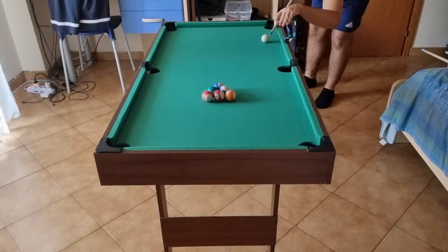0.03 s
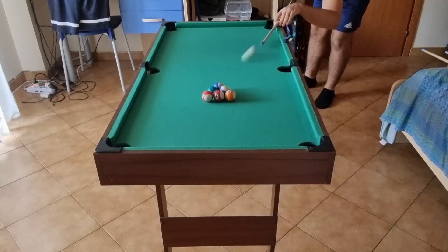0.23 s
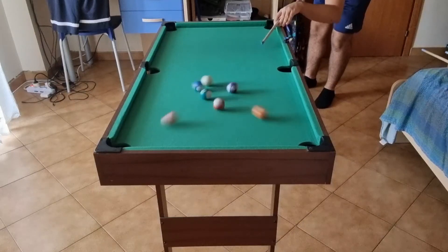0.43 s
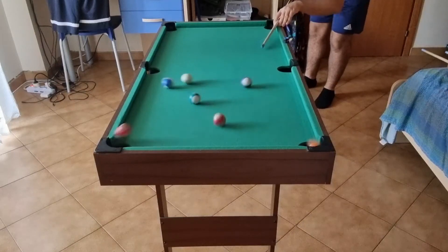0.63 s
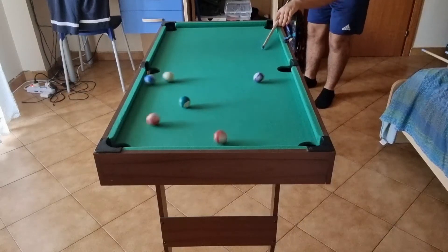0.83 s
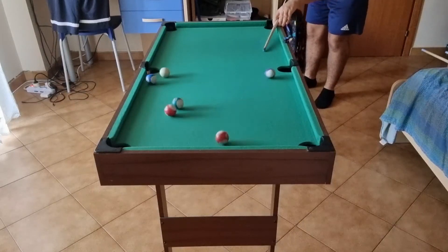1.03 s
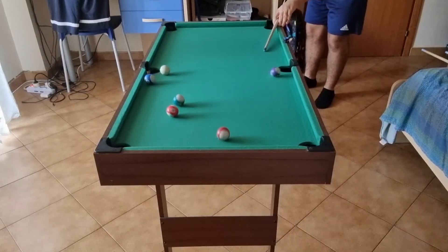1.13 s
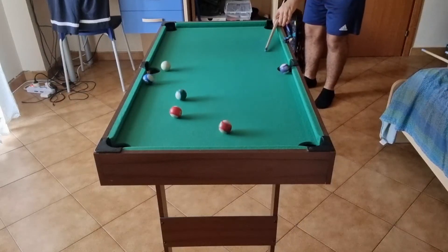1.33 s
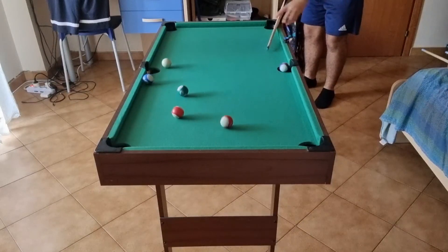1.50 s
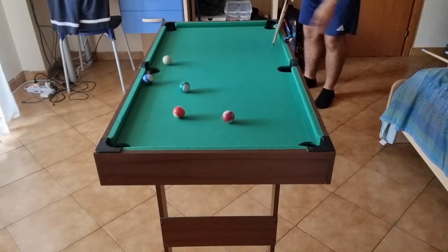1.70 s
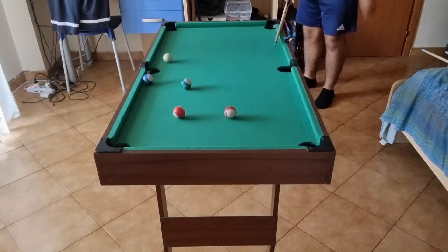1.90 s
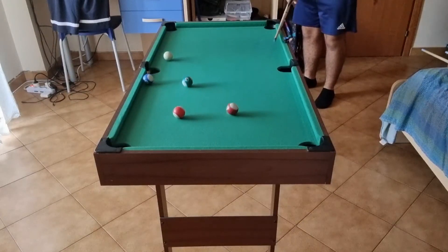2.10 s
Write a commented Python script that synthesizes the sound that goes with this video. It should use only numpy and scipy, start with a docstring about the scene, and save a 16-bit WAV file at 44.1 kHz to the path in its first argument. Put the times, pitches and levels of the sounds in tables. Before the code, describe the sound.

Pool balls crack apart in a break shot, then knock against the rails and roll.

```python
"""A break shot on a small wooden pool table in a tiled room.
Over quiet air and a low boom the cue slides over the hand, then knocks the white ball at 0.2 s.
At 0.35 s the ball cracks into the rack, leaving a glassy ring. Amid faint rustles, balls rumble over
the bed, thud on the cushions, knock on the rails and clack together; at 1.6 s one sinks into a pocket
with a hollow boom. Every blow shakes the table, and the hard room rings after it."""
import sys
import numpy as np
from scipy import signal
from scipy.fft import rfft, irfft
from scipy.io import wavfile
from scipy.ndimage import uniform_filter1d, minimum_filter1d

SR = 44100
rng = np.random.default_rng(int(sys.argv[2]) if len(sys.argv) > 2 else 0)


def digitize_waveform(pressure):
    """Quantize a signal to 16-bit integers and store it at the path in sys.argv[1].

    Rows of a 2-D input are taken as channels; values are limited to [-1, 1].
    """
    field = np.atleast_2d(pressure).T
    bounded = np.clip(field, -1, 1)
    quanta = np.round(bounded * 32767).astype(np.int16)
    wavfile.write(sys.argv[1], SR, quanta)


N = 94815
FFT_SIZE, BLOW_SAMPLES = 32768, 28672
HZ = np.fft.rfftfreq(FFT_SIZE, 1 / SR)


def amp(db):
    """Decibels to gain."""
    return 10 ** (np.asarray(db) / 20)


def at_hz(points, hz):
    """Interpolates a table on a log-frequency axis."""
    f, value = np.transpose(points)
    return np.interp(np.log(hz + 1), np.log(f + 1), value)


def unit_energy(x):
    """Scales to a mean energy of 1 per channel."""
    return x / np.sqrt(np.mean(np.sum(x ** 2, -1)) + 1e-20)


def unit_rms(spectrum):
    """Scales to RMS 1."""
    return spectrum / np.sqrt(np.mean(abs(spectrum) ** 2))


def add(mix, start_s, sound):
    """Mixes a stereo sound in at start_s."""
    part = mix[:, max(round(start_s * SR), 0):][:, :sound.shape[1]]
    part += sound[:, :part.shape[1]]


def delay(seconds):
    """Spectrum of a pure delay."""
    return np.exp(-2j * np.pi * HZ * seconds)


def click(gain):
    """Minimum-phase spectrum: the sharpest click of this colour, RMS 1."""
    log_gain = np.log(np.maximum(gain / gain.max(), 1e-6))
    cepstrum = irfft(log_gain)
    cepstrum[1:len(HZ) - 1] *= 2
    cepstrum[len(HZ):] = 0
    return unit_rms(np.exp(rfft(cepstrum)))


def body(colour, modes):
    """Gain of a struck body: broad colour times resonant peaks."""
    lift = sum((amp(db) ** 2 - 1) / (1 + (2 * (HZ - hz) / width_hz) ** 2) for hz, width_hz, db in modes)
    return amp(at_hz(colour, HZ)) * np.sqrt(np.maximum(1 + lift, .1))


def stereo(signals, coherence):
    """Two independent signals to left and right of a given coherence."""
    coherence = np.clip(coherence, -1, 1)
    mid = signals[0] * np.sqrt((1 + coherence) / 2)
    side = signals[1] * np.sqrt((1 - coherence) / 2)
    return np.array([mid + side, mid - side])


def scatter(size, step=8):
    """Two trains of random-sign taps, one tap per step samples."""
    taps = np.zeros((2, size))
    slots = np.arange(0, size - step, step)
    positions = slots + rng.integers(0, step, (2, len(slots)))
    np.put_along_axis(taps, positions, rng.choice([-1., 1.], positions.shape), 1)
    return taps


# room decay: f/Hz, T60/s
ROOM_DECAY = [(60, .9), (150, .85), (400, 0.41), (1000, 0.32), (2000, 0.38), (4000, 0.3), (7000, 0.33),
              (14000, .3)]
# room left-right likeness: f/Hz, coherence/0-1
ROOM_COHERENCE = [(60, 0.93), (200, 0.98), (450, 0.67), (900, .25), (2000, 0.08), (4000, 0.067),
                  (12000, .05)]
def room_tail(build_s):
    """Diffuse sound builds up, then dies at its own rate in each band."""
    hz, t, bands = signal.stft(scatter(BLOW_SAMPLES), SR, nperseg=512)
    bands = stereo(bands, at_hz(ROOM_COHERENCE, hz)[:, None])
    decay = amp(-60 * t / at_hz(ROOM_DECAY, hz)[:, None])
    tail = signal.istft(bands * decay, SR)[1][:, :BLOW_SAMPLES]
    swell = 1 - np.exp(-np.arange(BLOW_SAMPLES) / SR / build_s)
    return unit_energy(tail * swell)


# early reflections: nominal delay/s, level re direct/dB
REFLECTIONS = [(.0042, -15.5), (.0078, -12.5)]
# left-right likeness of the table's shaking: f/Hz, coherence/0-1
SHAKE_COHERENCE = [(100, 0.96), (350, 0.7), (800, 0.7), (3000, 0), (10000, 0)]
# colour of the tiled room: f/Hz, level/dB
TILE_SPECTRUM = [(100, 1), (400, 1), (1500, -2), (2400, 3), (3300, 2), (4100, 2.5), (5200, 4), (8000, -0.5)]
def blow(gain, direct_db, pan_db, build_s, shake_db, shake_s):
    """One impact: direct click and reflections, then the table shakes and the room rings."""
    cloth_echo = amp(-6) * delay(.00076)
    direct = unit_rms(click(gain) * (1 + cloth_echo)) * np.array([delay(0), delay(.00002)])
    direct *= 1 + sum(amp(db) * delay(lag_s * rng.uniform(.9, 1.1)) for lag_s, db in REFLECTIONS)
    t = np.arange(4096) / SR
    shake = unit_energy(scatter(len(t)) * np.exp(-t / shake_s))
    shake = stereo(rfft(shake, FFT_SIZE), at_hz(SHAKE_COHERENCE, HZ))
    diffuse = rfft(room_tail(build_s), FFT_SIZE) + amp(shake_db) * shake
    # flatten over 142.3 Hz bands, then colour
    band_power = uniform_filter1d((abs(diffuse) ** 2).mean(0), round(142.3 / HZ[1]))
    colour = gain * amp(at_hz(TILE_SPECTRUM, HZ)) / np.sqrt(band_power)
    diffuse = unit_rms(diffuse * click(colour))
    sound = irfft(amp(direct_db) * direct + diffuse)[:, :BLOW_SAMPLES]
    return sound * np.sqrt(.01 * SR) * amp([[pan_db / 2], [-pan_db / 2]])


def strikes(rows, gain, build_s, shake_db, shake_s, bass_hz=260, treble_hz=2400):
    """Blows on one body, each with its own weight (bass shelf) and hardness (treble shelf)."""
    out = np.zeros((2, N))
    bass = 1 / (1 + (HZ / bass_hz) ** 3)
    treble = 1 - 1 / (1 + (HZ / treble_hz) ** 2)
    for start_s, db, bass_db, treble_db, direct_db, pan_db in rows:
        colour = gain * amp(bass_db * bass + treble_db * treble)
        add(out, start_s, amp(db) * blow(colour, direct_db, pan_db, build_s, shake_db, shake_s))
    return out


def wash(colour, levels):
    """Coloured room noise along a level curve."""
    hz = np.fft.rfftfreq(N, 1 / SR)
    white = stereo(rfft(rng.standard_normal((2, N))), at_hz(ROOM_COHERENCE, hz))
    noise = irfft(white * amp(at_hz(colour, hz)), N)
    envelope = amp(np.interp(np.arange(N) / SR, *np.transpose(levels)))
    return unit_energy(noise) * np.sqrt(N) * envelope


# room air: f/Hz, level/dB
AIR_SPECTRUM = [(20, -8.5), (100, -6), (200, -7.5), (450, -10.5), (1000, -17.5), (2000, -28), (5000, -39),
                (9000, -49), (15000, -47.5)]
def room_air():
    """Steady noise of the quiet room."""
    return wash(AIR_SPECTRUM, [(0, -68)])


# boom envelope: t/s, level/dB
BOOM_LEVELS = [(0, -69), (.1, -58.5), (0.251, -55.5), (.38, -58.5), (.6, -66.5), (.88, -56.5), (1.05, -65),
               (1.4, -76), (1.581, -72.5), (1.66, -49.5), (1.77, -50), (1.9, -68.5), (2.022, -48.5),
               (2.15, -69)]
# boom colour: f/Hz, level/dB
BOOM_SPECTRUM = [(15, -16.5), (36, -13), (50, 1.5), (62, 0.5), (85, -29.5), (200, -42), (1000, -71.5),
                 (16000, -100)]
def room_boom():
    """The room's low boom swells and fades."""
    return wash(BOOM_SPECTRUM, BOOM_LEVELS)


# rumble envelope: t/s, level/dB
ROLL_LEVELS = [(0, -58.5), (.19, -70), (0.251, -83), (0.401, -69), (.6, -57.5), (0.902, -48), (1.1, -65),
               (1.249, -81), (1.549, -79), (1.7, -50.5), (1.9, -55.5), (2.03, -57), (2.15, -62.5)]
# rumble colour: f/Hz, level/dB
ROLL_SPECTRUM = [(30, -27), (80, -13), (112, 12), (200, -10), (500, -6), (900, -15.5), (1600, -23.5),
                 (4000, -49), (16000, -69.5)]
def rolling():
    """Balls rumble over the bed."""
    return wash(ROLL_SPECTRUM, ROLL_LEVELS)


# cue over hand, then rustles: peak t/s, level/dB, rise/s, decay/s
RUSTLE_EVENTS = [(.01, -70.5, 0.029, .04), (.11, -75, 0.045, 0.12), (.583, -66, .006, 0.021),
                 (0.655, -49, 0.0025, .025), (1.644, -59.5, 0.0077, 0.028), (1.752, -71, .008, .03),
                 (1.874, -62.5, 0.0069, 0.041)]
# rustle colour: f/Hz, level/dB
RUSTLE_SPECTRUM = [(200, -13), (1500, -0.5), (3000, -1), (5500, -1.5), (7500, -5), (10000, -12),
                   (15000, -14)]
def rustles():
    """The cue slides over the hand, then short, faint rustles sound close by."""
    out, t = np.zeros((2, N)), np.arange(N) / SR
    hiss = wash(RUSTLE_SPECTRUM, [(0, 0.00059)])
    for peak_s, db, rise_s, decay_s in RUSTLE_EVENTS:
        envelope = np.exp(-np.maximum((peak_s - t) / rise_s, (t - peak_s) / decay_s))
        out += hiss * amp(db) * envelope
    return out


# cue shot, two knocks: t/s, level/dB, bass/dB, treble/dB, direct/dB, left-right/dB
CUE_BLOWS = [(.2005, -22, -4, -15.5, -6, -0.5), (.2085, -21.5, 2.5, 9, -10.5, 1)]
# cue colour: f/Hz, level/dB
CUE_SPECTRUM = [(40, -34), (150, -3), (500, -1), (1400, 2.5), (2500, -4), (4000, -12), (6000, -15.5),
                (8000, -22), (9500, -27), (13000, -34.5), (16000, -42.5)]
# shaft resonances: f/Hz, width/Hz, lift/dB
SHAFT_MODES = [(458, 50, 6), (1040, 60, 5), (1200, 60, 4), (1423, 30, 11), (1495, 45, 7), (1980, 28, 12),
               (2350, 50, 5), (2885, 40, 9), (3280, 45, 4), (4230, 70, 4), (5350, 55, 8), (5850, 90, 6),
               (8050, 90, 6)]
def cue():
    """Tip on ball, then a second knock as the ball lands or the shaft rattles."""
    return strikes(CUE_BLOWS, body(CUE_SPECTRUM, SHAFT_MODES), build_s=.003, shake_db=-1.5, shake_s=.045)


# ball on cushion or pocket liner: t/s, level/dB, bass/dB, treble/dB, direct/dB, left-right/dB
CUSHION_BLOWS = [(.204, -31, -3, -18, -23, 2.5), (.349, -34, 7, 27.5, -7, -1),
                 (.592, -46.5, 29.5, 14, -1.5, 0), (.659, -43, 3, -3, -8.5, 0),
                 (.7155, -46.5, -7.5, -19, 2, -3), (.7215, -29.5, -7, -17, -6.5, 2),
                 (.9755, -30.5, -13.5, -19, -13, 0.5), (1.405, -49, -4, -8, -11, 0.5),
                 (1.742, -54, 20, -5, -8, -1.5), (1.860, -39.5, -6.5, -13.5, -7, 1),
                 (1.945, -48.5, -22, -12, -12.5, -6)]
# rubber colour: f/Hz, level/dB
RUBBER_SPECTRUM = [(30, -34), (100, 1), (300, 3.5), (480, 6.5), (800, -6), (1200, -19), (2000, -30.5),
                   (3800, -39), (6000, -44.5), (10000, -58.5), (15000, -51)]
# table resonances, shared with rail_knocks: f/Hz, width/Hz, lift/dB
WOOD_MODES = [(101, 10, 9), (130, 16, 4), (195, 20, 5), (293, 20, 5), (335, 25, 3), (470, 25, 2),
              (558, 22, 5), (705, 25, 4), (743, 22, 6), (792, 22, 9), (897, 20, 5), (936, 20, 5),
              (1020, 30, 3), (1102, 25, 4), (1180, 40, 3), (1580, 70, 3), (3150, 200, 4)]
def cushion_thuds():
    """Soft, heavy contacts drive the table at low frequencies."""
    gain = body(RUBBER_SPECTRUM, WOOD_MODES)
    return strikes(CUSHION_BLOWS, gain, build_s=.0098, shake_db=-.5, shake_s=.012)


# ball on ball, break first: t/s, level/dB, contact cut-off/Hz, direct/dB, left-right/dB
BALL_BLOWS = [(0.3454, -13, 7220, -3, 0), (0.3674, -28, 7010, 1.5, 0.5), (0.9129, -35, 6000, -7.5, 0.5),
              (0.918, -44.5, 5970, -9, 1), (0.9335, -45.5, 5600, -7, 0.5), (1.0284, -32.5, 5500, 4, 0)]
# ball colour: f/Hz, level/dB
BALL_SPECTRUM = [(40, -32.5), (300, -22.5), (800, -25), (1400, -13.5), (2100, -11.5), (2700, -3.5),
                 (3600, 0.5), (5000, -6), (6200, -18.5), (8000, -18), (16000, -32.5)]
def ball_clacks():
    """Hard balls touch for a fraction of a millisecond; slower ones touch longer and sound duller."""
    out, ball = np.zeros((2, N)), amp(at_hz(BALL_SPECTRUM, HZ))
    break_cutoff_hz = BALL_BLOWS[0][2]
    for start_s, db, cutoff_hz, direct_db, pan_db in BALL_BLOWS:
        hardness = cutoff_hz / break_cutoff_hz
        floor = amp(-32.5) * hardness ** 2
        contact = 1 / np.sqrt(1 + (HZ / cutoff_hz) ** 18) + floor
        build_s = .027 * hardness ** 3  # the room swells sooner after softer clacks
        clack = blow(ball * contact, direct_db, pan_db, build_s, shake_db=-14.5, shake_s=.015)
        add(out, start_s, amp(db) * clack)
    return out


# glassy ring: f/Hz, level/dB, T60/s
RING_MODES = [(2673, -27, .35), (2763, -29, .42), (2843, -30, .4), (3463, -30, .35), (3602, -29, .38),
              (3874, -26, .36), (3959, -19.5, .38), (4056, -21.5, .38), (4088, -26, .35), (4419, -26, .38),
              (4716, -29, .38)]
def break_ring(build_s=.045, spread_rad=.5):
    """High resonances swell after the crack and die with the room."""
    t = np.maximum(np.arange(N) / SR - BALL_BLOWS[0][0], 0)
    phases = rng.uniform(0, 2 * np.pi, (len(RING_MODES), 1, 1))
    phases = phases + spread_rad * rng.standard_normal((len(RING_MODES), 2, 1))  # per channel
    ring = sum(amp(db - 60 * t / t60_s) * np.sin(2 * np.pi * hz * t + phase)
               for (hz, db, t60_s), phase in zip(RING_MODES, phases))
    return ring * (1 - np.exp(-t / build_s))


# ball on rail or pocket wall: t/s, level/dB, bass/dB, treble/dB, direct/dB, left-right/dB
RAIL_BLOWS = [(.6543, -32, -27, 14.5, -14.5, 5), (.6625, -31, -22, 23.5, -20, -0.5),
              (.7302, -13.5, 1, 7.5, -16, 0), (.795, -31.5, -12, 7, -20, 9.5),
              (.848, -29, -1.5, -6, -14, -3.5), (.921, -29.5, -17, 9, -11.5, 2),
              (.981, -31.5, 2.5, -1, -16, -2.5), (1.2525, -37.5, 5.5, 15.5, -10.5, 0.5),
              (1.2595, -31.5, -7, -9, -10, -1), (1.6745, -21.5, 6, -4.5, -8, 0.5),
              (2.1022, -39, -6.5, 8, -19, 0)]
# wood colour: f/Hz, level/dB
WOOD_SPECTRUM = [(40, -28.5), (120, -14.5), (300, -5), (600, 5.5), (900, 3.5), (1250, -0.5), (1700, -11),
                 (2500, -22.5), (3500, -22.5), (5000, -36), (7000, -45), (10000, -56), (15000, -61.5)]
def rail_knocks():
    """Balls strike the rails and pocket walls and ring the table."""
    return strikes(RAIL_BLOWS, body(WOOD_SPECTRUM, WOOD_MODES), build_s=.012, shake_db=-1, shake_s=.014)


# ball into pocket: t/s, level/dB, bass/dB, treble/dB, direct/dB, left-right/dB
POCKET_BLOWS = [(1.6275, -32, 5.5, 1.5, -9.5, 1), (1.6365, -34.5, 12, -10, 2, 0),
                (1.6415, -30, -1, -10.5, -3, -0.5)]
# pocket colour: f/Hz, level/dB
POCKET_SPECTRUM = [(30, -31.5), (70, -15), (120, -5), (200, -8.5), (300, 1), (420, -12.5), (800, -7.5),
                   (1200, -17.5), (2000, -25), (3800, -26), (6000, -46), (10000, -57), (15000, -49)]
# pocket resonances: f/Hz, width/Hz, lift/dB
HOLLOW_MODES = [(196, 11, 10.4), (290, 92, 6.1), (345, 30, 12), (686, 120, 5.7)]
def pocket_drop():
    """A ball sinks into a pocket with a hollow boom."""
    gain = body(POCKET_SPECTRUM, HOLLOW_MODES)
    return strikes(POCKET_BLOWS, gain, build_s=.033, shake_db=3, shake_s=.024)


def scene():
    """All blows over the rolling balls and the quiet room."""
    blows = cue() + ball_clacks() + break_ring() + rail_knocks() + cushion_thuds() + pocket_drop()
    return blows + rustles() + rolling() + room_boom() + room_air()


def record(dry):
    """A fast limiter holds the crack at full scale; a low-pass follows."""
    ceiling, window_s, cutoff_hz = 1., .001, 15750
    size = round(window_s * SR)
    gain = ceiling / np.maximum(abs(dry).max(0), ceiling)
    held = minimum_filter1d(gain, 2 * size + 1)
    smoothed = uniform_filter1d(uniform_filter1d(held, size), size)
    lowpass = signal.firwin(511, cutoff_hz, window=("kaiser", 9), fs=SR)
    return signal.oaconvolve(dry * smoothed, lowpass[None], "same")


dry = scene()
out = record(dry)
digitize_waveform(out)
```